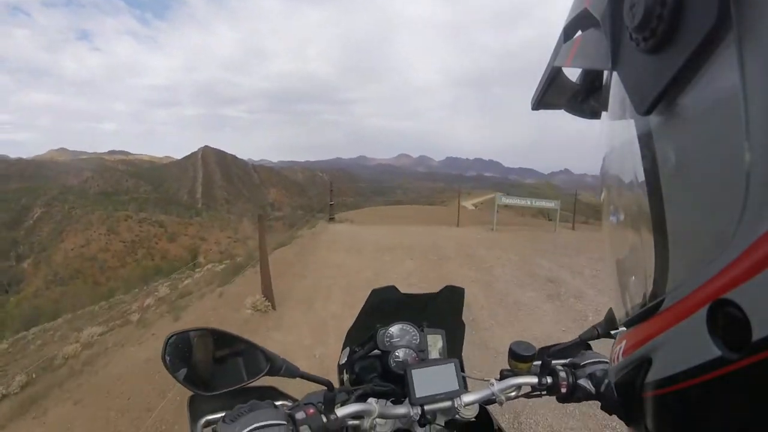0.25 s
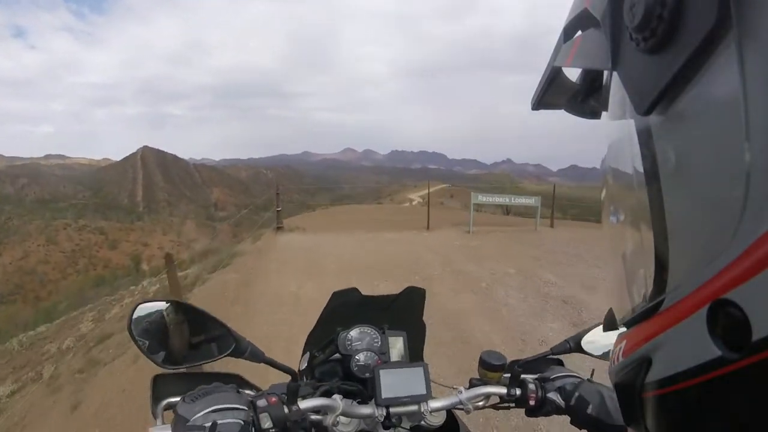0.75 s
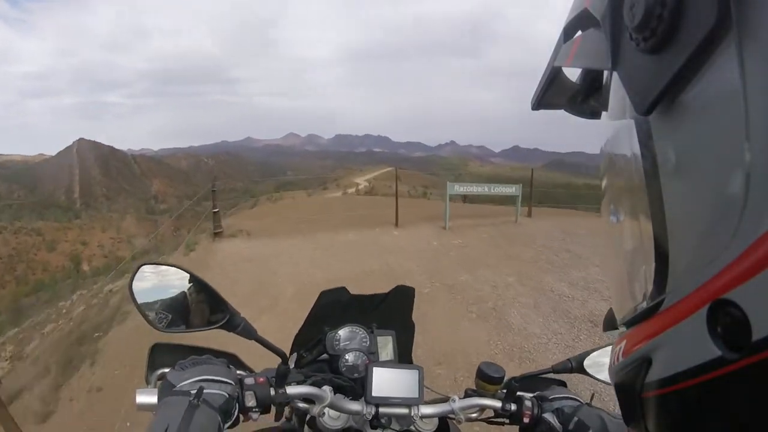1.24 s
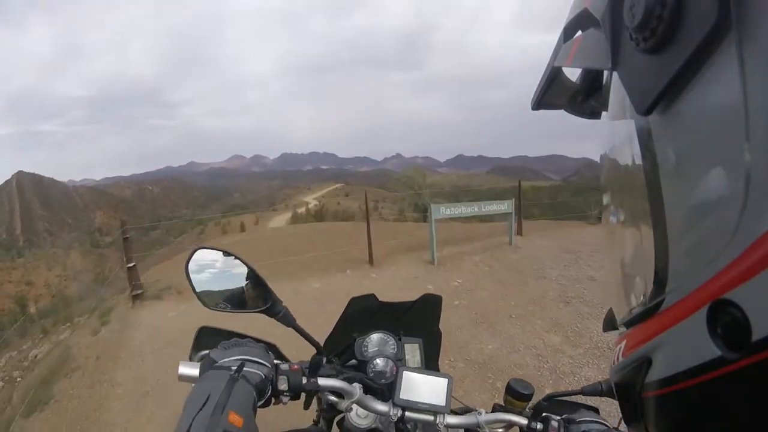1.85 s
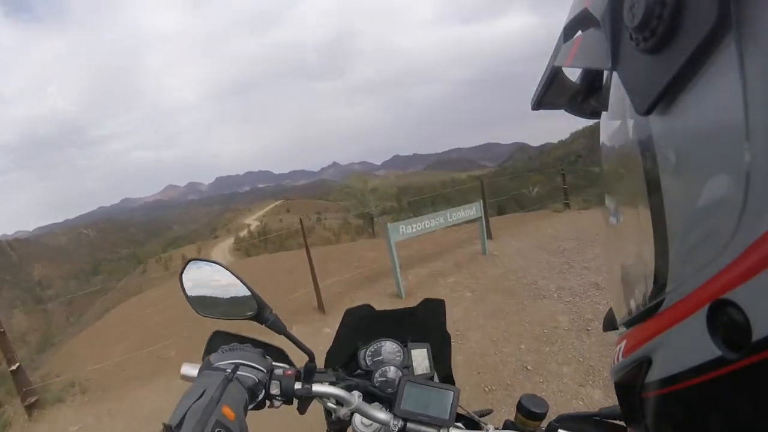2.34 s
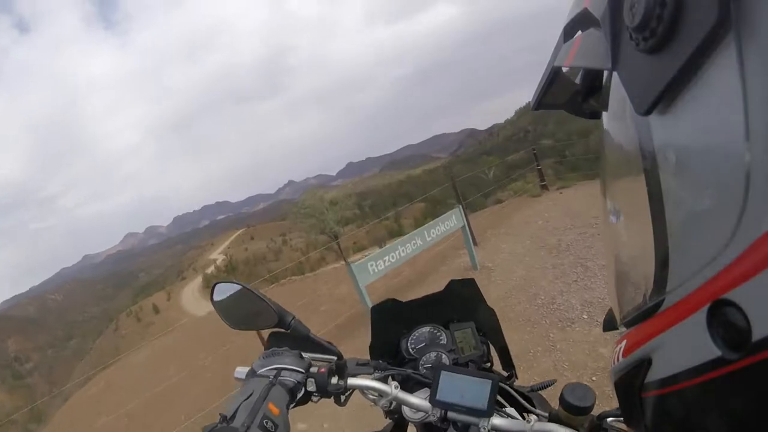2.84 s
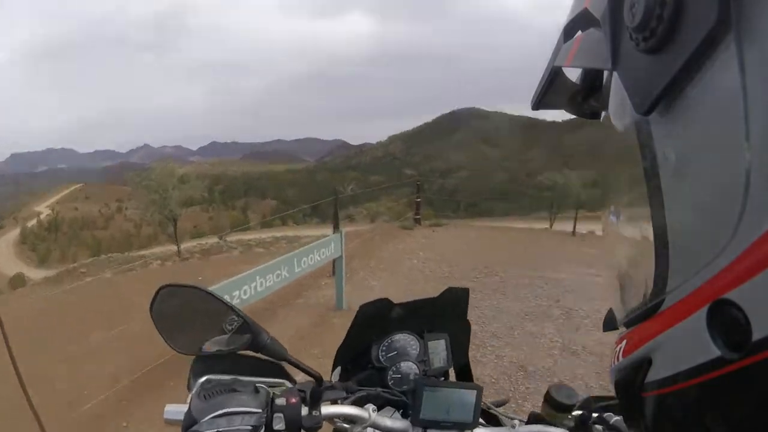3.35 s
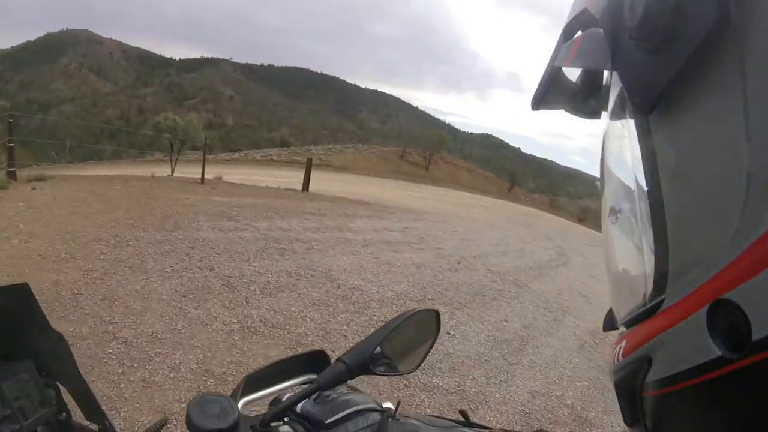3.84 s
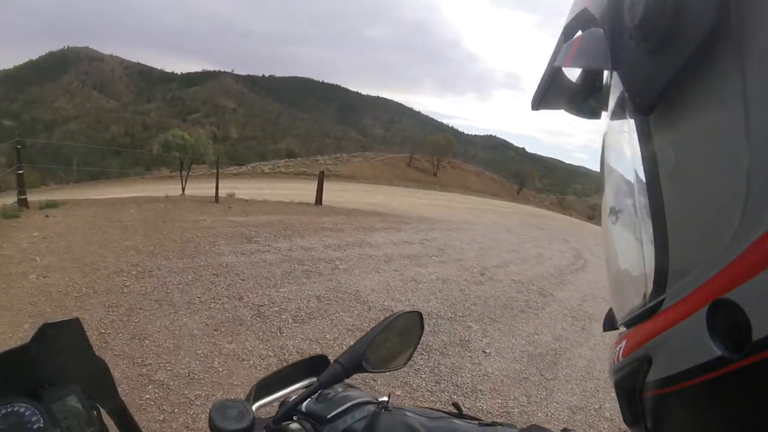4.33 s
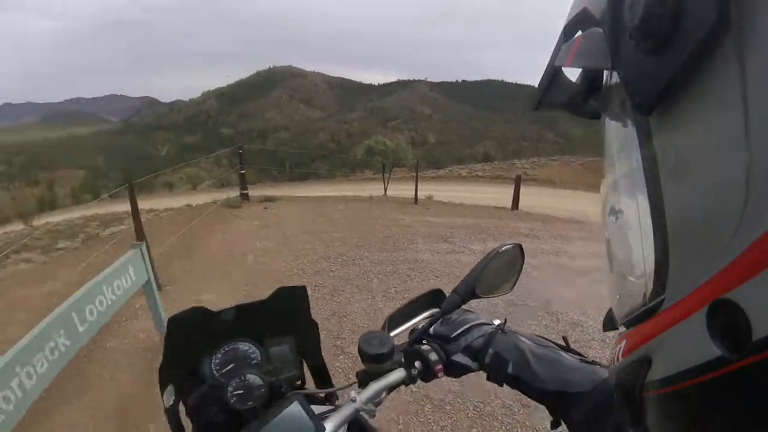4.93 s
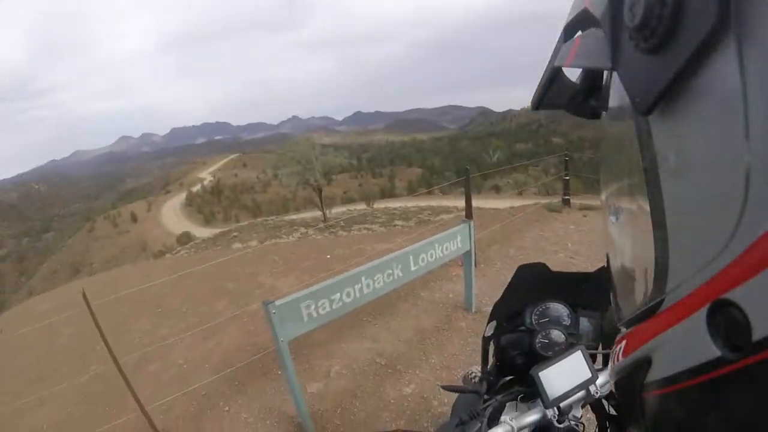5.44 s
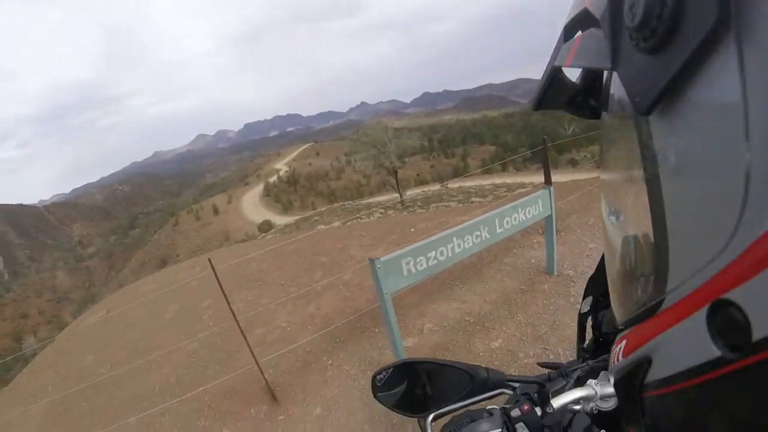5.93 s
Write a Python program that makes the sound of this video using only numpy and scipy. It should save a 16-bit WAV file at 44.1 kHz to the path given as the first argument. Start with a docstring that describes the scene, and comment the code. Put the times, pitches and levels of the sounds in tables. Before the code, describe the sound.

Steady low engine idle with ticking valves and fading gravel crunch, covered midway by rough wind buffeting, then left clear again as the bike stops.

```python
"""Motorcycle stopping on gravel

A twin-cylinder motorcycle rolls over gravel at tick-over, stops and idles, heard from the rider's helmet.
Each crank turn times an exhaust puff, with pipe echoes and silencer resonances, and a softer intake gulp.
Shaped noise gives the hiss of the valve gear; struck modes give its taps, and filtered noise the chain whirr.
Coloured noise and short pressure flips give the wind at the microphone; random impulses give the gravel.
Knocks ring the helmet shell, and there are a few sharp ticks."""
import sys
import numpy as np
from scipy import signal
from scipy.fft import rfft, irfft, next_fast_len
from scipy.io import wavfile
from scipy.ndimage import uniform_filter1d

SR = 44100
rng = np.random.default_rng(int(sys.argv[2]) if len(sys.argv) > 2 else 0)


def unload_wav(signal):
    """Save mono or channel-first audio to the path in sys.argv[1] as 16-bit WAV at rate SR, clipped to [-1, 1]."""
    wavfile.write(
        sys.argv[1],
        SR,
        np.round(np.clip(np.atleast_2d(signal).T, -1, 1) * 32767).astype(np.int16),
    )


N = 272538
TIME = np.arange(N) / SR  # s

# Engine at the helmet; bark grows as the head turns toward the silencer: [t/s, level/dB, bark control/dB]
ENGINE_LEVELS = [(0, -28, -21), (1.2, -28.5, -31), (2.4, -33.5, -2), (3.2, -29.5, -25), (3.6, -35.5, -6.5),
                 (4.1, -30.5, -4.5), (4.6, -29, -6), (5.0, -28.5, -9.5), (5.5, -26.5, -16),
                 (6.18, -25, -12)]


def from_db(db):
    """Amplitude ratio: twenty decibels are a factor of ten."""
    return 10 ** (np.asarray(db) / 20)


def rms_one(x):
    """Normalisation to unit root-mean-square value."""
    return x / np.sqrt(np.mean(x ** 2) + 1e-20)


def in_time(rows):
    """Linear interpolation: each column of a curve table at every sample."""
    s, *columns = np.transpose(rows)
    return [np.interp(TIME, s, column) for column in columns]


def colour(x, spectrum):
    """Zero-phase filtering: the Fourier spectrum is weighted by a curve [f/Hz, gain/dB]."""
    size = next_fast_len(N + SR // 2)
    hz, db = np.transpose(spectrum)
    bins = np.maximum(np.arange(size // 2 + 1) * SR / size, 1)
    gain = from_db(np.interp(np.log(bins), np.log(hz), db))
    return irfft(rfft(x, size) * gain, size)[..., :N]


def noise(spectrum):
    """Coloured noise: white noise shaped by a spectrum, at rms 1."""
    return rms_one(colour(rng.standard_normal(N), spectrum))


def drift(rate):
    """Low-passed chance: noise through two equal poles at rate (Hz), with rms 1."""
    step = 40  # samples between the slow values
    warm_up = 2000  # slow values discarded while the filter settles
    r = np.exp(-2 * np.pi * rate * step / SR)
    white = rng.standard_normal(N // step + warm_up + 2)
    slow = signal.lfilter([1], [1, -2 * r, r * r], white)[warm_up:]
    return np.interp(np.arange(N) / step, np.arange(len(slow)), rms_one(slow))


def evened(x, size):
    """Automatic gain: division by a running rms over about size samples."""
    power = uniform_filter1d(uniform_filter1d(x ** 2, size), size // 2)
    return x / np.sqrt(power + 1e-12)


def resonate(x, hz, width_hz):
    """Forced resonance: a pole pair passes a band, with gain 1 on top."""
    r = np.exp(-np.pi * width_hz / SR)
    zeros = np.array([1, 0, -1]) * (1 - r * r) / 2
    poles = [1, -2 * r * np.cos(2 * np.pi * hz / SR), r * r]
    return signal.lfilter(zeros, poles, x + 1e-18)


def ring(x, hz, t60):
    """Free damped vibration: a unit click starts a sine of height 1 that falls 60 dB in t60 (s)."""
    r = np.exp(-np.log(1000) / (t60 * SR))
    w = 2 * np.pi * hz / SR
    return signal.lfilter([0, np.sin(w)], [1, -2 * r * np.cos(w), r * r], x + 1e-18)


def clicks(rows):
    """Impulse train: one impulse for each row [t/s, height/dB]."""
    s, db = np.transpose(rows)
    return np.bincount((s * SR).astype(int), from_db(db), N)


def stroke(turn, at, width, uneven_db):
    """Periodic flow pulse: a Gaussian puff once a turn; at and width in turns, strength uneven within +-dB."""
    nearest = np.round(turn - at)
    strength = from_db(uneven_db * rng.uniform(-1, 1, size=256))
    puff = np.exp(-.5 * ((turn - at - nearest) / width) ** 2)
    return puff * strength[nearest.astype(int)]


def beam(s, width_s, swell_db):
    """Directivity: a mode swells as the head swings through its beam."""
    return from_db(swell_db * np.exp(-.5 * ((TIME - s) / width_s) ** 2))


def struck(at, force, modes, bloom_hz):
    """Modal excitation: uneven blows ring each mode, a narrow band rounds the onset; rms 1 outside the beams."""
    rings = []
    for hz, db, t60, *_ in modes:
        blows = np.bincount(at, force * (1 - rng.random(len(at)) / 2), N)
        rings.append(from_db(db) * resonate(ring(blows, hz, t60), hz, bloom_hz))
    beamed = sum(x * beam(*mode[3:]) for x, mode in zip(rings, modes))
    return beamed / np.std(sum(rings))


def engine_beat(turn):
    """Pulsed flow and reflection: puffs echo in the pipe and ring the silencer; the intake gulps and refills."""
    # Reflections in the exhaust pipe: [delay/s, signed gain]
    pipe_echoes = [(.0006, -1.07), (.0045, -.38), (.0092, .36)]
    # Silencer resonances: [f/Hz, width/Hz, level/dB]
    silencer = [(92, 12, -11.5), (182.4, 6.7, 8.5), (276.5, 3.8, -3.5), (386, 12, 1)]
    level_db, bark_db = in_time(ENGINE_LEVELS)
    wobble = .004 * drift(25)  # turns
    puff = stroke(turn + wobble, at=.852, width=.0255, uneven_db=1)
    echoes = sum(gain * np.interp(TIME - delay, TIME, puff) for delay, gain in pipe_echoes)
    pipe = puff + echoes
    exhaust = pipe + sum(from_db(db) * resonate(pipe, hz, width) for hz, width, db in silencer)
    chamber = resonate(resonate(pipe, 293, 115), 385, 172)
    bark = from_db(bark_db + 12.0) * chamber
    gulp = stroke(turn, at=.465, width=.045, uneven_db=.6)
    gulp += .85 * stroke(turn, at=.55, width=.06, uneven_db=.6)
    refill = stroke(turn, at=.49, width=.15, uneven_db=.6)
    intake = .36 * gulp - .3 * refill
    high_pass = signal.butter(2, 14, "high", fs=SR, output="sos")
    beat = signal.sosfilt(high_pass, exhaust + bark + intake)
    flutter = from_db(.5 * drift(90))
    return from_db(level_db) * rms_one(beat * flutter)


def intake_rasp(turn):
    """Turbulent flow noise: air tears past the valve and rings the airbox; gas burbles after each stroke."""
    level_db, bark_db = in_time(ENGINE_LEVELS)
    rush = rng.standard_normal(N) * stroke(turn, at=.4, width=.065, uneven_db=1)
    airbox = rms_one(resonate(resonate(rush, 540, 100), 556, 440))
    flow = stroke(turn, at=.94, width=.1, uneven_db=1.5) / 2
    flow += stroke(turn, at=.5, width=.09, uneven_db=2) / 4
    gas = noise([(60, -4.5), (130, -2.0), (220, -2.0), (330, -3.0), (430, -12.5), (700, -42.0)])
    burble = rms_one(1 / 10 + flow) * gas
    # both follow the bark, in part
    airbox_db = -30.5 + 0.11 * bark_db
    burble_db = -20 + .3 * bark_db
    return from_db(level_db) * (from_db(airbox_db) * airbox + from_db(burble_db) * burble)


def casing_gain(db, shading):
    """Head shadow: the gain of a casing sound follows a share of the shading as the head turns."""
    # Shading of the engine casing as the rider turns the head: [t/s, level/dB]
    casing = [(0.05, -49.5), (1.08, -48), (1.65, -55.5), (2.02, -56.5), (2.05, -56), (2.07, -64),
              (3.26, -54), (3.55, -56), (3.9, -52), (4.98, -47.5), (6.15, -50.5)]
    open_db = -48  # table level at which nothing is shaded
    return from_db(db + shading * (in_time(casing)[0] - open_db))


def valve_taps(turn):
    """Impact excitation: valves seat twice a turn, hard then soft, and ring the covers."""
    # Engine covers: [f/Hz, level/dB, T60/s, head faces the mode t/s, time in its beam/s, swell then/dB]
    covers = [(556, 8, 0.075, 4.83, 0.2, 11.5), (817, 3, 0.22, 1.7, 0.26, 7.5),
              (1183, 4, 0.15, 5.8, 0.27, 3.5), (1318, 8.5, 0.046, 6.1, .35, 4),
              (1616, -3.5, 0.095, 4.4, .3, 17.5), (1844, -2, 0.19, 3.4, 0.36, 6),
              (2180, -8.5, .06, 4.5, 0.14, 13), (3555, -5.5, 0.17, 15, .4, 7),
              (5790, 0.5, 0.15, 9.3, 0.42, 6), (6500, -4.5, 0.27, 8.6, .25, 9)]
    hard = np.flatnonzero(np.diff(np.floor(turn - .365)))
    soft = np.flatnonzero(np.diff(np.floor(turn - .82)))
    force = np.r_[np.ones(len(hard)), np.full(len(soft), from_db(-9))]
    return struck(np.r_[hard, soft], force, covers, bloom_hz=400)


def valve_gear(turn):
    """Amplitude modulation: the hiss and clatter of chain and tappets swell twice in each turn."""
    # Spectrum of the clatter: [f/Hz, density/dB]
    clatter_spectrum = [(300, 8), (430, 8.5), (560, 6), (720, 0), (830, 0), (950, -2), (1280, -3.5),
                        (1500, -5.5), (1850, -6), (2600, -9.5), (3400, -13), (4300, -21.5), (9000, -38)]
    # Spectrum of the hiss: [f/Hz, density/dB]
    hiss_spectrum = [(3000, -15), (4500, -13), (5150, -0.5), (5720, 2.5), (6050, -3), (6430, 4),
                     (7100, -6.5), (7900, -8), (8700, -7.5), (9500, -13.5), (10200, -21), (13000, -16.5)]
    firing = stroke(turn, at=.95, width=.1, uneven_db=2)
    drawing = stroke(turn, at=.44, width=.075, uneven_db=3)
    tappets = stroke(turn, at=.41, width=.012, uneven_db=4)
    rattle = 1 + .38 * firing + .38 * drawing + .2 * tappets
    swell = 1 + 0.31 * firing + 0.12 * drawing
    clatter = casing_gain(db=-43, shading=0.85) * noise(clatter_spectrum) * rms_one(rattle)
    taps = casing_gain(db=-56, shading=1) * valve_taps(turn)
    flicker = from_db(1.4 * drift(79))
    hiss = casing_gain(db=-48, shading=1) * noise(hiss_spectrum) * rms_one(swell) * flicker
    return clatter + taps + hiss


def chain_ring():
    """Beamed resonance: the cam chain keeps a cover ringing, which stands out when the head faces it."""
    cover = resonate(resonate(rng.standard_normal(N), 1840, 220), 2100, 770)
    return casing_gain(db=-61, shading=2.6) * rms_one(cover)


def loose_tappet(turn):
    """Impact with timing jitter: one tappet pings with each exhaust beat, a little early or late."""
    # The ping, clearest as the head swings across the cylinders: [t/s, level/dB]
    tappet_level = [(0, -58.5), (2.2, -74.5), (3.2, -63), (3.6, -73), (4.6, -66), (5.1, -65), (6.18, -63)]
    # Its modes: [f/Hz, level/dB, T60/s, head faces the mode t/s, time in its beam/s, swell then/dB]
    tappet_modes = [(1810, 2, .035, 5.03, .16, 12), (2600, 2, .035, 5.14, .11, 13),
                    (2905, -1, .035, 5.75, .45, 6), (3290, -4, .03, 5.3, .3, 4),
                    (1320, -2, .03, 5.8, .4, 8)]
    jitter = .02 * drift(8)  # turns
    at = np.flatnonzero(np.diff(np.floor(turn - .77 + jitter)))
    return from_db(in_time(tappet_level)[0]) * struck(at, 1, tappet_modes, bloom_hz=110)


def drive_chain():
    """Noise-driven resonance: the links whirr over the sprockets, fading as the machine slows."""
    # Whirr of the drive chain: [t/s, level/dB]
    whirr_level = [(0, -60), (0.6, -54), (1.1, -53.5), (1.6, -62), (3.6, -75), (5.4, -83)]
    # Resonances that it rings: [f/Hz, width/Hz, level/dB]
    whirr_modes = [(381, 36, 2.5), (766, 16, -2), (1848, 100, -5), (2074, 110, -3)]
    links = rng.standard_normal(N)
    whirr = np.zeros(N)
    for hz, width, db in whirr_modes:
        band = resonate(resonate(links, hz, width), hz, 4 * width)
        whirr += from_db(db) * evened(band, size=6000)
    return from_db(in_time(whirr_level)[0]) * whirr


def road_speed():
    """Uniform deceleration: the share of full rolling speed, steady and then braked evenly to a stop."""
    brake_s, stop_s = 0.94, 5.4
    return np.clip((stop_s - TIME) / (stop_s - brake_s), 0, 1)


def gravel():
    """Random impacts: stones snap against each other, fewer and softer as the wheels slow."""
    # Spectrum of a stone's crunch: [f/Hz, gain/dB]
    crunch_spectrum = [(300, 8.5), (550, 18), (800, 8.5), (1100, 2), (2000, 2), (3000, -2.5), (4200, -31.5),
                       (6500, 0), (10000, -12.5)]
    stones_per_s = 500  # at full speed
    speed = road_speed()
    sizes = from_db(5.0 * np.minimum(rng.exponential(1, N), 4)) * rng.choice([-1, 1], N)
    stones = sizes * (rng.random(N) < stones_per_s * speed / SR)
    crunch = rms_one(colour(stones, crunch_spectrum))
    return from_db(-50.5) * speed ** 3.5 * crunch


def gust_strength():
    """Power addition: each gust swells, holds and dies away; overlapping gusts add in power."""
    # Gusts on the microphone: [start t/s, hold/s, level/dB]
    gust_rows = [(0.668, 0.06, -24), (0.92, 0.055, -23.5), (1.134, 0.072, -22), (1.325, 0.016, -23.5),
                 (1.42, .11, -17.5), (1.62, 0.033, -20), (1.683, 0.427, -21), (2.188, 0.046, -24),
                 (2.334, 0.068, -18.5), (2.475, 0.23, -21), (2.775, 0.35, -27.5), (3.123, 0.13, -25),
                 (3.317, 0.12, -19), (5.104, 0.32, -27), (5.183, 0.17, -28), (5.235, 0.07, -26.5)]
    attack_s, release_s = 0.022, 0.025
    power = np.zeros(N)
    for start, hold, db in gust_rows:
        before = np.maximum(start - TIME, 0) / attack_s
        after = np.maximum(TIME - start - hold, 0) / release_s
        power += from_db(db) ** 2 * np.exp(-(before + after) ** 2)
    return np.sqrt(power)


def wind(gusts):
    """Turbulent pressure: low lumpy swings, of which the strongest tear nonlinearly into crackle."""
    # Wind buffeting the microphone: [f/Hz, density/dB]
    buffet_spectrum = [(15, -10.5), (28, 3.5), (55, -1), (85, -3), (130, -7.5), (200, -14), (300, -23.5),
                       (450, -31.5), (700, -41.5), (1200, -64), (3000, -94.5)]
    # Torn air: [f/Hz, density/dB]
    tearing_spectrum = [(100, -18), (230, -5.5), (400, -9), (600, -4), (900, -2.5), (1300, -29.5),
                        (2500, -18.5), (6000, -72)]
    # light breeze between the gusts, and the airstream of the ride
    steady = np.hypot(from_db(-38), from_db(-33.5) * road_speed())
    level = np.hypot(gusts, steady)
    eddies = evened(noise(buffet_spectrum), size=3000)
    tear = (2 * np.tanh(np.maximum(eddies, 0) / 2)) ** 2
    crackle = from_db(-15) * level ** 1.88 * tear * noise(tearing_spectrum)
    return level * eddies + crackle


def lesser_eddies(gusts):
    """Jittered point process: eddies at uneven times, each following the gust that carries it."""
    # Levels relative to the gust: [thump/dB, rasp/dB, crackle/dB]
    eddy_db = [0, -11, -35.5]
    eddies_per_s, scatter_db = 30, 3.5
    chance = rng.uniform(-0.996, 1, (int(eddies_per_s * TIME[-1]), 4))
    s = (np.arange(len(chance)) + (1 + chance[:, 0]) / 2) / eddies_per_s
    gust_db = 20 * np.log10(np.interp(s, TIME, gusts) + 1e-9)
    return np.c_[s, gust_db[:, None] + eddy_db + scatter_db * chance[:, 1:]]


def slaps(gusts):
    """Vortex passage: an eddy pushes, then flips abruptly to suction; its core pops, snaps, rasps and crackles."""
    # The strongest eddies, relative levels: [t/s, thump/dB, rasp/dB, crackle/dB]
    strong_eddies = [(0.898, -15, -38, -64), (0.935, -25, -37, -52), (1.147, -14, -39.5, -44),
                     (1.158, -26, -31, -38.5), (1.21, -12, -45, -50), (1.304, -15, -18, -54),
                     (1.412, -27, -20.5, -50), (1.446, -15, -20.5, -59), (1.476, -12, -19.5, -59),
                     (1.499, -25, -17.5, -30.5), (1.515, -21, -27, -41), (1.531, -11.5, -31.5, -50),
                     (1.545, -13, -24, -58), (1.606, -12, -52, -62), (1.631, -12, -28, -47),
                     (1.665, -19, -29.5, -53), (1.713, -12, -23, -53), (1.729, -15, -22, -54),
                     (1.772, -10.5, -53, -57), (1.792, -14, -35, -48), (1.811, -19, -23.5, -55),
                     (1.826, -36, -31, -45.5), (1.855, -12.5, -26.5, -58), (1.885, -23, -30, -50),
                     (1.911, -22, -35.5, -38), (1.925, -13.5, -28, -40), (1.946, -22, -33.5, -56),
                     (1.993, -35, -32.5, -45), (2.019, -30, -34.5, -46), (2.033, -34, -25.5, -44),
                     (2.053, -9, -22, -45), (2.082, -15, -28, -46), (2.104, -12.5, -27, -48),
                     (2.162, -30, -27, -48), (2.189, -31, -26.5, -43), (2.231, -16, -38, -59),
                     (2.256, -18, -33, -56), (2.322, -29, -51.5, -58), (2.378, -34, -32, -44.5),
                     (2.452, -41, -26, -45), (2.477, -27, -38, -42.5), (2.522, -27, -32, -61),
                     (2.539, -22, -22, -47), (2.554, -33, -23, -59), (2.581, -40, -29.5, -49),
                     (2.676, -17, -45, -62), (2.71, -21.5, -42, -56), (2.75, -36, -40, -52),
                     (2.859, -16, -20, -56), (2.967, -18.5, -38, -59), (3.163, -11, -36, -49),
                     (3.231, -19, -18, -41), (3.301, -16, -25.5, -54), (3.319, -16, -25, -49),
                     (3.332, -12.5, -34.5, -55), (3.365, -20, -45.5, -56), (3.390, -7.5, -23, -39),
                     (3.433, -15, -16.5, -51), (3.441, -25, -20.5, -44), (3.467, -31, -43.5, -68),
                     (3.610, -40, -32, -40), (5.185, -20, -28, -60), (5.259, -10, -24, -57),
                     (5.275, -9, -24, -55), (5.296, -9, -36.5, -56)]
    # Rasp and pop inside a slap: [f/Hz, gain/dB]
    rasp_spectrum = [(70, -21.5), (140, 6), (240, 6.5), (400, -4.5), (750, -19), (1200, -42), (3000, -80.5)]
    # Crackle and snap inside a slap: [f/Hz, gain/dB]
    crackle_spectrum = [(400, -17), (850, 3), (1700, -6.5), (2600, -21.5), (5000, -46), (9000, -64)]
    thump_s, edge_s, rasp_s, crackle_s = 0.0047, 0.0011, 0.004, 0.0048
    rasp = from_db(-5.5) * evened(noise(rasp_spectrum), size=400)
    spit = from_db(-9.5) * evened(noise(crackle_spectrum), size=200)
    rows = np.vstack([strong_eddies, lesser_eddies(gusts)])
    pops = colour(clicks(rows[:, [0, 2]]), rasp_spectrum)
    snaps = colour(clicks(rows[:, [0, 3]]), crackle_spectrum)
    out = from_db(36.5) * pops + from_db(35.0) * snaps
    for s, thump_db, body_db, crackle_db in rows:
        near = abs(TIME - s) < .03
        age = TIME[near] - s
        flip = -np.tanh(age / edge_s)  # push to suction
        out[near] += from_db(thump_db) * flip * np.exp(-.5 * (age / thump_s) ** 2)
        out[near] += from_db(body_db) * rasp[near] * np.exp(-.5 * (age / rasp_s) ** 2)
        out[near] += from_db(crackle_db) * spit[near] * np.exp(-.5 * (age / crackle_s) ** 2)
    return out


def knocks_and_ticks():
    """Contact time and bandwidth: padded knocks ring the helmet shell dully; hard ticks die at once."""
    # Dull knocks on the helmet: [t/s, relative level/dB]
    knock_rows = [(3.437, -8.5), (3.517, -11.5), (3.591, -9.5), (3.606, -18), (3.612, -11), (3.620, -31)]
    # Modes of the helmet shell: [f/Hz, level/dB, T60/s]
    helmet = [(112, 0, .11), (250, -7, .045), (390, -7, .04), (600, -13, .04)]
    # Sharp ticks: [t/s, relative level/dB]
    tick_rows = [(1.734, -54), (2.054, -37), (2.477, -56), (3.398, -44.5), (3.607, -52)]
    # Spectrum of a tick: [f/Hz, gain/dB]
    tick_spectrum = [(400, 7), (1500, 12), (3000, 2.5), (4500, 3.5), (6000, -6.5), (10000, -4.5),
                     (14000, -17)]
    contact_s = .0005  # spread of the Gaussian contact
    pad = signal.windows.gaussian(257, contact_s * SR)
    contact = np.convolve(clicks(knock_rows), pad / pad.sum(), "same")
    jolt = np.gradient(contact)
    knocks = np.zeros(N)
    for hz, db, t60 in helmet:
        per_slope = SR / (2 * np.pi * hz)  # offsets the rise of the gradient with frequency
        knocks += from_db(db) * per_slope * ring(jolt, hz, t60)
    ticks = from_db(23.5) * colour(clicks(tick_rows), tick_spectrum)
    return ticks - knocks


def scene():
    """Superposition: the crank phase times the engine beat, valves and tappet; wind and gravel lie on top."""
    # Crankshaft speed: [t/s, f/Hz as turns per second]
    crank = [(0.0, 20.76), (0.3, 20.67), (0.7, 20.03), (1.2, 20.12), (2.5, 20.98), (3.4, 22.18),
             (3.8, 21.55), (4.0, 21.13), (4.2, 21.58), (4.55, 21.09), (4.9, 21.37), (5.25, 21.18),
             (5.55, 20.82), (5.85, 20.97), (6.18, 21.23)]
    turn = np.cumsum(in_time(crank)[0]) / SR
    gusts = gust_strength()
    engine = engine_beat(turn) + intake_rasp(turn) + valve_gear(turn) + chain_ring() + loose_tappet(turn)
    motorcycle = engine + drive_chain()
    return (motorcycle + gravel() + wind(gusts) + slaps(gusts) + knocks_and_ticks())[None]


def record(dry):
    """Saturation and band-limiting: loud peaks are rounded; the treble steps down and is then cut."""
    rounded = np.tanh(dry)
    dulled = colour(rounded, [(9600, 0), (10200, -14), (12500, -14), (14000, -30)])
    low_pass = signal.ellip(8, .3, 60, 13000, fs=SR, output="sos")  # ripple dB, stop dB, cutoff Hz
    return signal.sosfilt(low_pass, dulled)


dry = scene()
out = record(dry)
unload_wav(out)
```